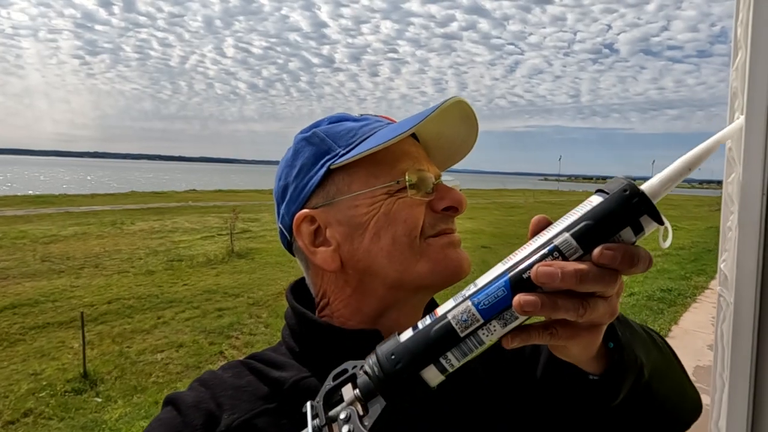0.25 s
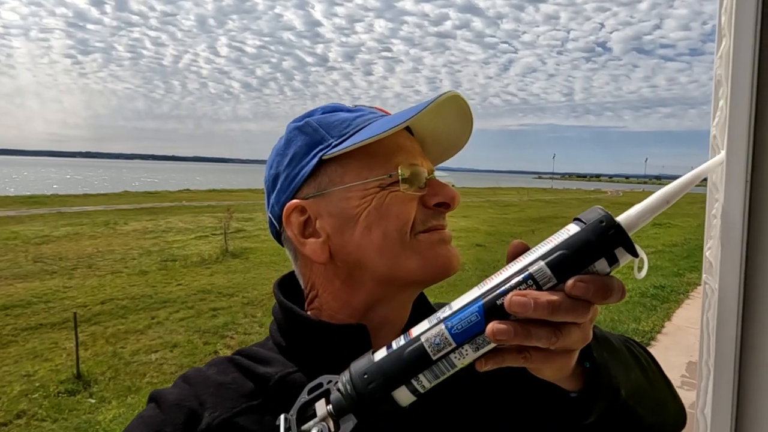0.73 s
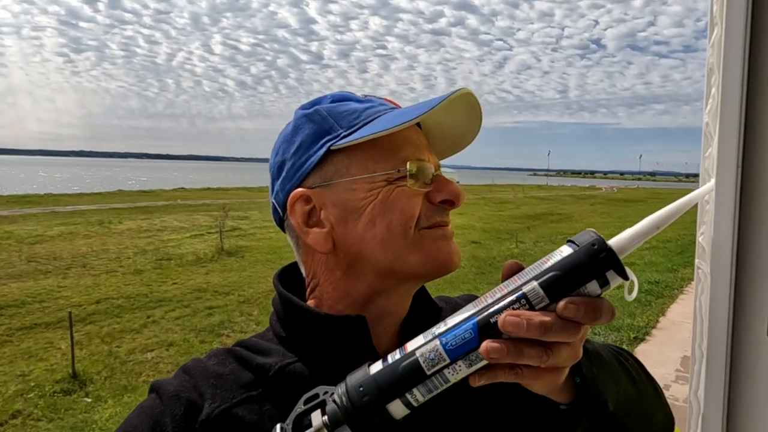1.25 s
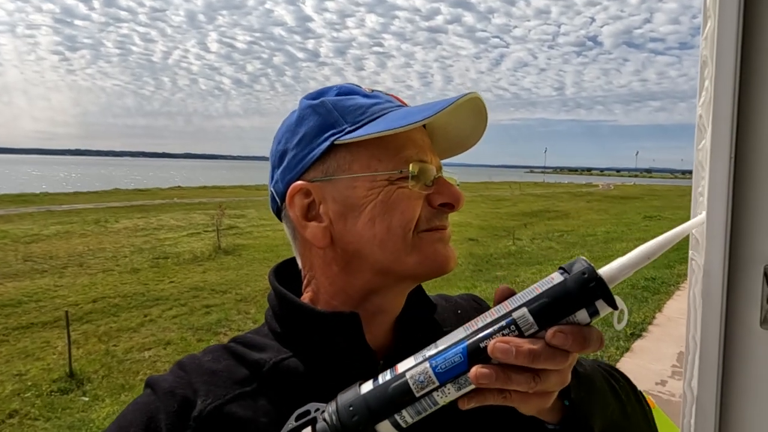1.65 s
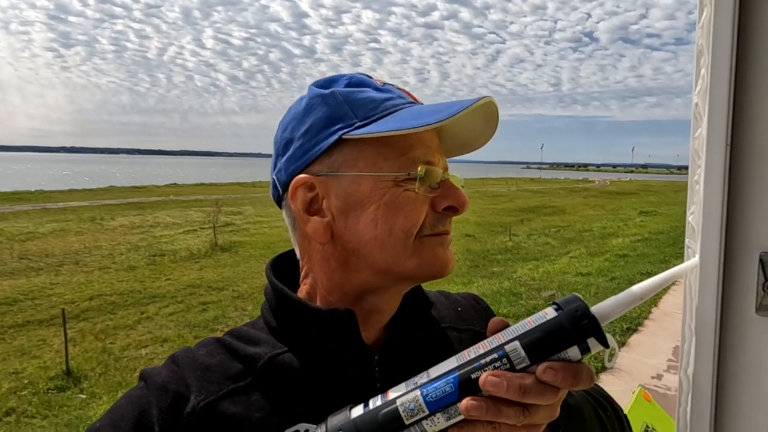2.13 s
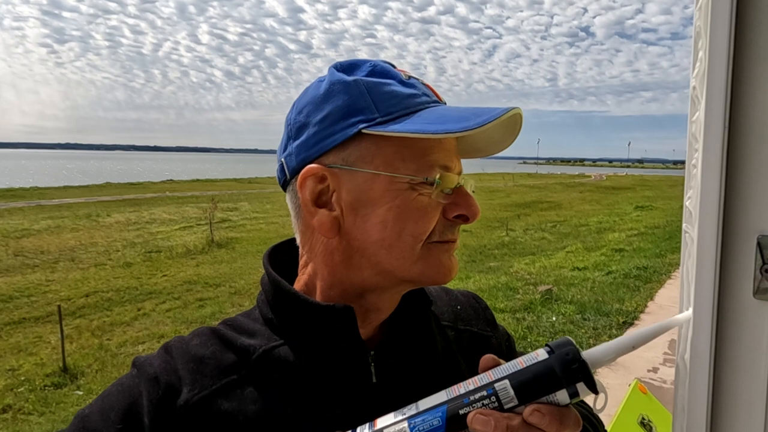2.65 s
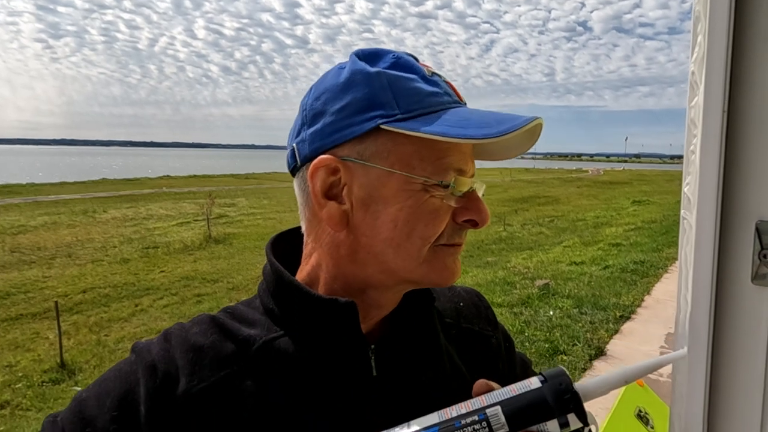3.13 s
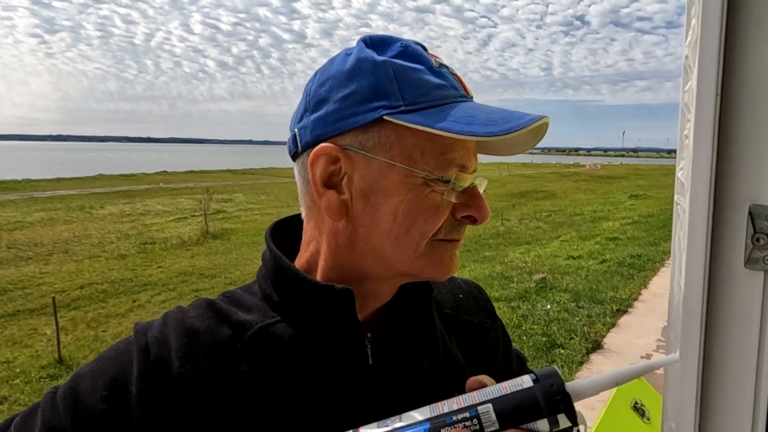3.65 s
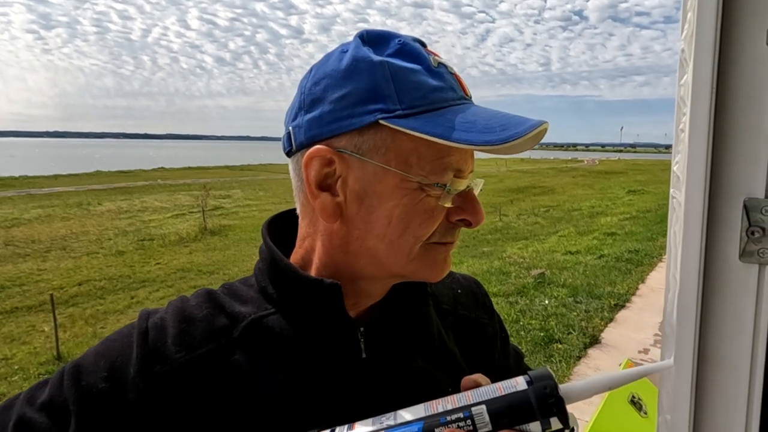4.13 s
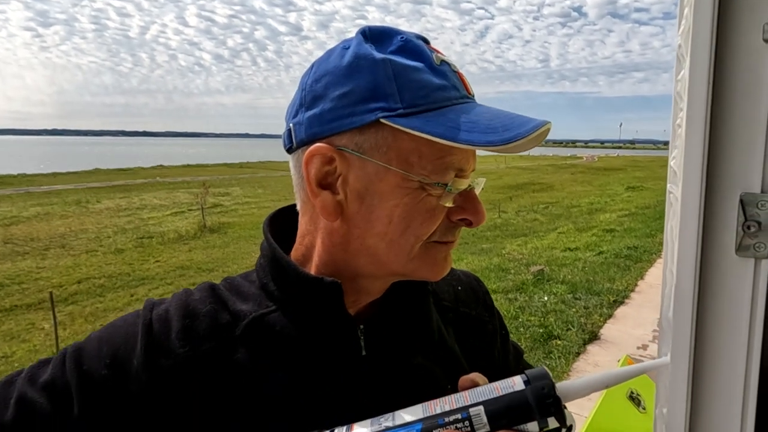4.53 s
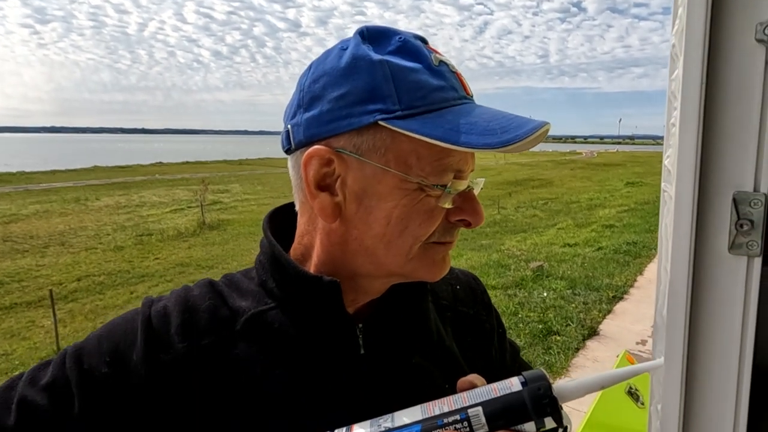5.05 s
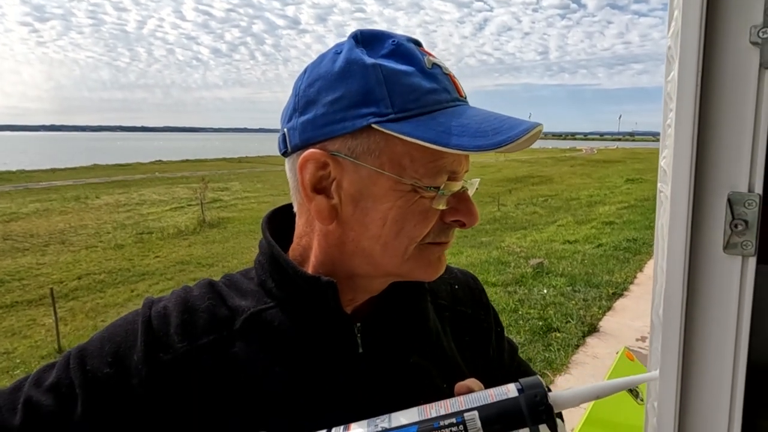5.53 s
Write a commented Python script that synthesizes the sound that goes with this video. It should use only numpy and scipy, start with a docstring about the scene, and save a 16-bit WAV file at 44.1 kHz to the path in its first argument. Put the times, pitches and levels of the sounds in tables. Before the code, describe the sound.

A caulking gun ticks, clicks and gives one sharp metallic snap, while low wind rumbles and buffets the microphone outdoors.

```python
"""A caulking gun in the wind

A hand squeezes a caulking gun beside a doorway in open country. Its steel pawl (the catch that grips
the push rod) ticks and clicks; then the release snaps, knocks the tube and leaves the rod ringing.
Wind thumps mostly on the right microphone, over a far drone and the rustle of a jacket.
The sound starts in the centre and widens to stereo."""
import sys
import numpy as np
from scipy import signal
from scipy.fft import rfft, irfft, next_fast_len
from scipy.io import wavfile
from scipy.ndimage import map_coordinates

SR = 44100
rng = np.random.default_rng(int(sys.argv[2]) if len(sys.argv) > 2 else 0)


def generate_wav(sig):
    """Save sig (samples, or channels by samples) to the path in sys.argv[1] as 16-bit PCM at SR."""
    pcm = np.round(np.clip(np.atleast_2d(sig).T, -1, 1) * 32767).astype(np.int16)
    wavfile.write(sys.argv[1], SR, pcm)


N = 255339


def amp(db):
    """Turn a level in dB into a gain."""
    return 10 ** (np.asarray(db) / 20)


def along(points, hz):
    """Read between (Hz, value) points on a log frequency scale."""
    freqs, values = np.transpose(points)
    return np.interp(np.log(hz + 1), np.log(freqs + 1), values)


def curves(rows):
    """Draw each column after the time as a curve, one value per sample."""
    times, *columns = np.transpose(rows)
    return [np.interp(np.arange(N) / SR, times, column) for column in columns]


def wobble(rate):
    """A smooth curve through `rate` random values a second."""
    return map_coordinates(rng.standard_normal(int(N * rate / SR) + 4), [np.arange(N) * rate / SR])


def filtered(x, response):
    """Change the strength and phase of each frequency in x."""
    size = next_fast_len(x.shape[-1] + 8192)
    return irfft(rfft(x, size) * response(np.fft.rfftfreq(size, 1 / SR)), size)[..., :x.shape[-1]]


def noise(spectrum, size=N):
    """Noise shaped by (Hz, dB) points, with an average (rms) level of 1."""
    x = filtered(rng.standard_normal(size), lambda hz: amp(along(spectrum, hz)))
    return x / np.sqrt(np.mean(x ** 2) + 1e-20)


def rough_tone(hz, t, rough):
    """A sine whose phase takes random steps of about `rough` radians a sample."""
    return np.sin(2 * np.pi * hz * t + np.cumsum(rng.normal(0, rough, len(t))))


def add(track, start, sound):
    """Mix a sound into a track from `start` seconds on."""
    part = track[..., round(start * SR):][..., :sound.shape[-1]]
    part += sound[..., :part.shape[-1]]


# How the background rises and falls. Each row: time in seconds, drone gain in dB, rustle gain in dB.
BACKGROUND_GAINS = [(0, -61, -78.5), (.85, -63, -86), (1.6, -62, -86.5), (2.47, -61, -81.5),
                    (2.76, -62.5, -86), (3.69, -60.5, -81.5), (3.95, -60.5, -78), (4.2, -60.5, -77),
                    (4.45, -60.5, -87.5), (4.9, -58.5, -75), (5.3, -63, -86), (5.69, -68, -101),
                    (5.79, -69, -101)]
# The tone colours of drone and jacket. Each row: frequency in Hz, relative level in dB.
DRONE_SPECTRUM = [(26, -33.5), (45, -5), (87, -1), (125, -22.5), (165, -11), (320, -28.5), (450, -29),
                  (810, -36), (1000, -33.5), (1300, -31), (1950, -36.5), (2300, -45.5), (3400, -52.5),
                  (4400, -65.5), (7000, -64.5), (9100, -99), (15400, -120)]
JACKET_SPECTRUM = [(2000, -30), (3500, -1.5), (6500, -2.5), (8100, -5), (9300, -17), (10800, -18.5),
                   (12000, -12), (12700, -15), (13200, -44)]

def background():
    """A far drone, a thin whine that follows its level, and the rustle of a jacket."""
    drone_db, rustle_db = curves(BACKGROUND_GAINS)
    # Left and right differ more in the treble.
    apart = lambda hz: amp(along([(150, -29.5), (600, -11), (1500, -6), (5000, 1)], hz))
    drone = noise(DRONE_SPECTRUM) + filtered(noise(DRONE_SPECTRUM), apart) * [[1], [-1]]
    crackle = amp(1.7 * wobble(5.8) + 3.8 * wobble(75))
    cloth = noise(JACKET_SPECTRUM) + amp(-0.5) * noise(JACKET_SPECTRUM) * [[1], [-1]]
    drone *= amp(16.5 + .7 * wobble(6.7))
    whine_hz, width_hz = 3390, 45
    whine = np.sqrt(2) * rough_tone(whine_hz, np.arange(N) / SR, np.sqrt(2 * np.pi * width_hz / SR))
    return amp(drone_db) * (drone + amp(-23.5) * whine) + amp(rustle_db - 3) * crackle * cloth


# The breeze between gusts. Each row: time in seconds, rumble level in dB.
BREEZE_LEVELS = [(0, -49.5), (.12, -47), (.35, -44), (.55, -46), (1.1, -52.5), (1.45, -38), (1.75, -43.5),
                 (1.95, -34.5), (2.4, -44.5), (2.9, -42.5), (3.15, -46.5), (3.8, -40), (4.4, -39),
                 (4.9, -35.5), (5.05, -41.5), (5.4, -33.5), (5.79, -50)]
# Single gusts. Each row: peak time in seconds, seconds to rise and to fade about 20 dB (sign ignored),
# rumble level in dB, flutter compared with rumble in dB, left-side gain in dB.
WIND_GUSTS = [(.24, 0.1846, 0.04, -36.5, -21.5, -3.5), (.369, 0.35, 0.49, -38, -15.5, -12.5),
              (.48, -0.2839, -0.01, -36, -18, -3.5), (2.74, 0.1421, 0.13, -29, -32, -5),
              (3.51, 0.08, 0.06, -40, -14, -8.5), (3.715, .03, -0.07, -29, -22.5, -5),
              (4.05, 0.33, 0.41, -38, -17.5, -8), (4.18, -0.38, 0.22, -34, -26.5, -11.5),
              (4.43, -0.0069, -0.0155, -29, -18, -8.5), (4.691, -0.028, 0.0613, -20.5, -8, -9.5),
              (4.722, 0, 0.0437, -22.5, -2.5, -13), (4.755, 0.008, 0.0325, -24, -9.5, -11.5),
              (4.86, 0.12, 0.0839, -25, -13, -5.5), (4.95, 0.215, 0.06, -33.5, -12.5, -12),
              (5.143, -0.0034, 0.06, -16, -2, -10), (5.17, 0.02, 0.02, -24, -11, -7.5),
              (5.27, -0.0819, 0.1844, -22, -10, -8), (5.32, -0.0062, 0.0189, -18.5, -5.5, -4),
              (5.405, -0.0258, -0.09, -25, -7, -7), (5.465, 0.08, -0.0942, -24, -10.5, -6),
              (5.551, 0.0873, 0.15, -28, -14.5, -8.5), (5.66, 0.0124, -0.0372, -22.5, -10, -4),
              (5.72, 0.1434, 0.03, -29.5, -11.5, -0.5)]

def gusts():
    """Gusts swell over an uneven breeze: gives rumble gain, flutter gain and left-side gain in dB."""
    peak, rise, fade, db, flutter_db, left_db = np.transpose(WIND_GUSTS)[:, :, None]
    rounding, flutter_speed = .12, 1.53  # gusts have round tops; flutter comes and goes faster
    t = np.arange(N) / SR - peak
    from_peak = t / np.abs(np.where(t < 0, rise, fade))
    drop_db = -20 * (np.hypot(from_peak, rounding) - rounding)
    each_gust = amp(db + drop_db)
    breeze = amp(curves(BREEZE_LEVELS)[0] + 3.5 * wobble(rate=12))
    rumble = breeze + each_gust.sum(axis=0)
    flutter = amp(-51) + amp(db + flutter_db + flutter_speed * drop_db).sum(axis=0)
    balance_db = (-1.5 * breeze + (each_gust * left_db).sum(axis=0)) / rumble  # the strongest leads
    return rumble, flutter, balance_db


def thump(hz):
    """A swirl of air bursts on the microphone: a quick pulse whose pitch sags."""
    peak_cycles, sag_per_cycle = 0.654, 0.29
    cycles = np.arange(round(8 / hz * SR)) / SR * hz
    wave = np.sin(2 * np.pi * (1 - np.exp(-sag_per_cycle * cycles)) / sag_per_cycle)
    pulse = wave * (cycles / peak_cycles) ** 2 * np.exp(-2 * cycles / peak_cycles)
    return pulse / np.abs(pulse).max()


def surge(hz):
    """One slow push and pull of air pressure."""
    t = np.arange(round(1.01 / hz * SR)) / SR
    return np.sin(2 * np.pi * hz * t) * np.hanning(len(t))


# The wind's deep rumble and higher flutter. Each row: frequency in Hz, relative level in dB.
RUMBLE_SPECTRUM = [(12, -1), (28, -1.5), (60, -7.5), (110, -19.5), (200, -37.5), (400, -72), (800, -130)]
FLUTTER_SPECTRUM = [(50, -40), (110, 4.5), (200, -6.5), (400, -19.5), (800, -37.5), (1500, -65.5),
                    (3000, -130)]
# Quick thumps and slow surges. Each row: start in seconds, relative level in dB, starting pitch in Hz.
WIND_THUMPS = [(4.685, -14.5, 329.7), (4.7104, -14, 327.5), (4.749, -25.5, 199.2), (5.127, -22, 169),
               (5.1426, -19, 418.6), (5.148, -21.5, 249.1), (5.28, -18.5, 353.9), (5.306, -20.5, 251.6),
               (5.327, -25, 278.6), (5.35, -33, 300.6), (5.385, -30, 256.4), (5.402, -28, 269.9),
               (5.412, -27.5, 220.1), (5.462, -31, 258), (5.498, -46, 600), (5.548, -32.5, 197),
               (5.635, -31.5, 266), (5.659, -29, 222.5), (5.68, -31.5, 220.9)]
WIND_SURGES = [(.219, -32.5, 35.22), (0.489, -31, 40.3), (2.719, -24, 41.3), (3.70, -26.5, 27.62),
               (4.167, -26, 35.08), (4.417, -23, 29.85), (4.677, -9, 46.11), (4.747, -11.5, 47.76),
               (4.78, -18.5, 30.11), (4.853, -17.5, 33.06), (4.882, -19.5, 36.06), (5.111, -14.5, 39.5),
               (5.143, -15, 70.83), (5.156, -18, 55.2), (5.21, -20, 21.97), (5.26, -11, 32.05),
               (5.305, -12, 47.46), (5.331, -16, 44.9), (5.446, -18.5, 51.1), (5.54, -16, 59.9),
               (5.62, -19.5, 24.93), (5.664, -18.5, 35.05)]

def wind(cutoff_hz=1800):
    """Swirls of air hit the right microphone; the left gets a weaker share plus swirls of its own."""
    rumble, flutter, left_db = gusts()

    def swirls():
        return rumble * noise(RUMBLE_SPECTRUM) + flutter * amp(3.46 * wobble(40)) * noise(FLUTTER_SPECTRUM)

    right = amp(-2.5) * swirls()
    for start, db, hz in WIND_THUMPS:
        add(right, start, amp(db) * thump(hz))
    for start, db, hz in WIND_SURGES:
        add(right, start, amp(db) * surge(hz))
    right = filtered(right, lambda hz: 1 / (1 + (hz / cutoff_hz) ** 4))
    shifted = filtered(right, lambda hz: np.exp(1j * along([(40, -0.36), (300, 0.859)], hz)))
    left = amp(left_db) * (shifted + amp(-8) * swirls())
    return amp(2.5) * np.array([left, right])


# How long the doorway echoes. Each row: frequency in Hz, seconds to fade 60 dB.
ECHO_FADES = [(500, 0.12), (2000, 0.17), (3000, 0.23), (6000, 0.24), (9000, 0.2), (12000, 0.14),
              (15000, 0.13)]

def doorway(x):
    """Scattered echoes swell for a few milliseconds, then each band fades at its own pace."""
    hz, t, bands = signal.stft(rng.standard_normal((2, SR // 2)), SR, nperseg=256)
    tail = signal.istft(bands * amp(-60 * t / along(ECHO_FADES, hz)[:, None]), SR, nperseg=256)[1]
    tail *= np.clip((np.arange(tail.shape[1]) / SR - .006) / 0.0048, 0, 1)
    tail = tail[0] + .5 * tail[1] * [[1], [-1]]
    echoes = signal.fftconvolve(x.mean(0)[None], tail / np.linalg.norm(tail[0]), axes=1)[:, :N]
    # Air and soft ground soak up the treble.
    dull = lambda f: amp(along([(3000, 1.5), (7000, -0.5), (11000, -5), (15000, -7)], f))
    return filtered(echoes, dull)


# Rubs of hand and trigger, and squeaks of the rod.
# Each row: start in seconds, length in seconds, pitch in Hz, relative level in dB.
HAND_RUBS = [(4.812, .016, 2600, -62), (0.15, 0.236, 2926, -75), (0.248, 0.0248, 2780, -64),
             (0.251, 0.031, 6000, -76), (.47, 0.07, 5050, -80.5), (0.017, 0.252, 3440, -80.5),
             (0.445, 0.092, 4000, -82.5), (0.655, 0.086, 3500, -83), (1.748, 0.15, 4964, -83),
             (2.384, 0.056, 5000, -77.5), (3.525, 0.1185, 6680, -70), (3.877, 0.42, 7060, -81.5),
             (4.083, 0.041, 3620, -69.5), (4.404, 0.144, 6150, -81), (4.795, 0.0743, 5840, -43),
             (5.02, 0.154, 5970, -81)]
ROD_SQUEAKS = [(.678, .016, 3400, -69), (1.238, .016, 3400, -71), (1.315, .028, 3400, -71),
               (3.748, .022, 5100, -70), (3.915, .035, 5100, -79), (4.11, .1, 5100, -74)]

def sliding():
    """Hand and trigger slide with a grainy hiss, and the rod chirps in its guide."""
    out = np.zeros(N)
    grit = amp(2.5 * wobble(150))
    for start, length, hz, db in HAND_RUBS:
        swell = np.hanning(round(length * SR))
        hiss = noise([(hz / 2, -24), (hz, 0), (hz * 1.3, -10), (hz * 2, -50)], size=len(swell))
        add(out, start, amp(db) * swell * hiss)
    out *= grit
    for start, length, hz, db in ROD_SQUEAKS:
        t = np.arange(round(length * SR)) / SR
        add(out, start, amp(db) * np.hanning(len(t)) * rough_tone(hz, t, rough=0.073))
    return out


def ring(modes, attack, rough, flat=0, settle_s=.1):
    """A struck part rings at its modes (natural tones); the hand on it makes them waver."""
    t = np.arange(SR) / SR
    bent_time = t - flat * settle_s * (1 - np.exp(-t / settle_s))  # pitch starts low by the share `flat`
    tones = sum(amp(db - 60 * t / fade_s) * rough_tone(hz, bent_time, rough) for hz, db, fade_s in modes)
    return tones * (1 - np.exp(-t / attack))


def resonances(modes):
    """A filter that lets through the tones a steel part favours."""
    return lambda f: sum((-1) ** k * amp(db) * 1j * f * width / (hz * hz - f * f + 1j * f * width)
                         for k, (hz, width, db) in enumerate(modes))


def blurred(modes, widen=2.5):
    """The same steel heard from all sides: its tones are wider and their powers add up."""
    return lambda f: np.sqrt(sum(np.abs(resonances([(hz, widen * width, db)])(f)) ** 2
                                 for hz, width, db in modes))


def clack(response, rise_s, fade_s):
    """A short rattle shakes all of a part's tones evenly; the result peaks at 1."""
    t = np.arange(SR // 20) / SR
    spectrum = rfft(rng.standard_normal(len(t)) * (1 - np.exp(-t / rise_s)) * amp(-60 * t / fade_s))
    rattle = irfft(spectrum / np.abs(spectrum), len(t)) * amp(-20 * t / fade_s)
    sound = filtered(rattle, response)
    return sound / np.abs(sound).max()


# The steel pawl's tones. Each row: pitch in Hz, width in Hz, relative level in dB.
PAWL_MODES = [(676, 170, -18.5), (1156, 160, -20), (1555, 260, -10), (2420, 236, -2), (3088, 180, -8.5),
              (3254, 130, -8), (4044, 170, -13), (4712, 240, -8), (5433, 270, -8.5), (6330, 390, -17),
              (7460, 300, -7.5), (8870, 480, -19.5), (11430, 1000, -20.5)]
# Its clicks. Each row: start in seconds, level in dB, brightness in dB per octave,
# left over right in dB, favoured pitch in Hz.
PAWL_CLICKS = [(0.163, -54.5, -9, 6, 4650), (.254, -58.5, -7, 1.5, 5770), (.259, -52, -6.5, 1.5, 2900),
               (.495, -63.5, -1, -0.5, 12000), (0.6836, -62, -2, 0, 3400), (1.744, -59, -3.5, -1, 3300),
               (1.808, -61.5, 0, -3, 12000), (2.0817, -48, -4, 16.5, 2200), (2.093, -30.5, -4.5, 8, 1730),
               (2.3195, -57, -4.5, 3, 3173), (2.406, -52.5, -0.5, 7, 4700), (2.44, -64, 2, -1, 4650),
               (2.657, -60.5, -1, 4.5, 3160), (3.069, -65.5, -2.5, 4.5, 4200), (3.209, -64, 3, 1, 4500),
               (3.5298, -58, -5, 3.5, 6296), (3.541, -59, -0.5, 4.5, 11700), (3.5783, -45, 0, 7, 6400),
               (3.591, -49, -2.5, -2.5, 6000), (3.618, -35, -9.5, -1.5, 1520), (3.6218, -30, 2, 2, 4020),
               (3.6265, -38.5, -9.5, 6.5, 800), (3.638, -31, -2.5, 3.5, 4700),
               (3.6384, -29, -4, -0.5, 2425), (3.6428, -40, -10.5, -0.5, 1170),
               (3.647, -46.5, -4, -1.5, 3400), (3.751, -61, 6, 3.5, 11900), (3.999, -53.5, 0.5, 1.5, 6000),
               (4.9863, -53, -4.5, 3, 5297), (5.2696, -55, -8.5, 2.5, 4284),
               (5.309, -62.5, -2, -5.5, 11500), (5.316, -62, -5.5, -7.5, 4400),
               (5.45, -55.5, -9.5, 1.5, 5224)]

def pawl(body, favour_db, graze_db=-45, favour_octaves=0.16, top_hz=13000):
    """Each contact rattles the pawl; weak ones only graze it and blur its tones."""
    out = np.zeros((2, N))
    for start, db, bright_db, pan_db, hz in PAWL_CLICKS:
        steel = body(PAWL_MODES) if db > graze_db else blurred(PAWL_MODES)

        def colour(f):
            tilt_db = bright_db * np.log2((f + 300) / 3000)
            lift_db = favour_db * np.exp(-(np.log2((f + 1) / hz) / favour_octaves) ** 2)
            return steel(f) * amp(tilt_db + lift_db) / (1 + (f / top_hz) ** 20)

        click = clack(colour, rise_s=0.0007, fade_s=0.01)
        add(out, start, amp(db) * click * amp([[pan_db / 2], [-pan_db / 2]]))
    return out


# The release lever's tones. Each row: pitch in Hz, width in Hz, relative level in dB.
LEVER_MODES = [(1360, 660, -9.5), (2014, 210, -1), (2365, 380, -8.5), (3041, 200, 1), (3337, 250, -3.5),
               (4140, 470, -3), (5220, 490, 0), (6270, 370, 1.5), (7860, 500, -2), (8380, 600, -4),
               (9400, 500, -5), (10800, 580, -10), (11320, 750, -12), (13340, 820, -13.5),
               (15074, 900, -31)]
# The tube's hollow knock. Each row: pitch in Hz, level in dB, seconds to fade 60 dB.
TUBE_MODES = [(563.3, -3, 0.02), (303, -32.5, 0.0051)]
# The lever letting go, then hitting its stop. Each row: start in seconds, level in dB.
LEVER_SCRAPES = [(4.824, -17.5)]
LEVER_STRIKES = [(4.8285, -7), (4.8438, -31), (4.847, -29.5)]

def release(body, dull_hz=7000):
    """The lever lets go with a soft scrape, knocks the tube, then strikes its stop and bounces."""
    out = np.zeros(N)
    lever = body(LEVER_MODES)
    softened = lambda f: lever(f) / (1 + 1j * f / dull_hz) ** 2
    for start, db in LEVER_SCRAPES:
        add(out, start, amp(db) * clack(softened, rise_s=0.00412, fade_s=0.027))
        add(out, start + 0.0018, ring(TUBE_MODES, attack=0.0011, rough=.002))
    for start, db in LEVER_STRIKES:
        add(out, start, amp(db) * clack(lever, rise_s=0.00067, fade_s=0.011))
    return out


# The push rod's tones. Each row: pitch in Hz, level in dB, seconds to fade 60 dB.
ROD_MODES = [(755, -41, .35), (1997, -53.5, .5), (2767, -59, 1.2), (2853, -56, .65), (3112, -57, .75),
             (3386, -62, .5), (4005, -62, 1.3)]

def rod():
    """The rod rings after the lever's first strike and trembles in the grip; its top tone bends up."""
    out = np.zeros(N)
    lower = ring(ROD_MODES[:-1], attack=.002, rough=.034)
    top = ring(ROD_MODES[-1:], attack=.002, rough=.04, flat=.015)
    add(out, LEVER_STRIKES[0][0], lower + top)
    return out * amp(2.2 * wobble(rate=40))


# How the gun reaches the two microphones. Each row: frequency in Hz, left over right in dB.
LEFT_BALANCE = [(6000, .5), (10000, 3.5), (11800, 1), (13200, -8), (15000, -3)]
# How far the left one is ahead. Each row: frequency in Hz, phase lead in radians.
LEFT_LEAD = [(800, 0), (2500, -.4), (4500, -1), (6500, -.7), (8500, -.2), (11500, -.2), (15000, -.3)]

def scene():
    """The gun and its echo reach two microphones, along with the background and the wind."""
    direct = pawl(resonances, favour_db=8) + release(resonances)
    echo = doorway(pawl(blurred, favour_db=0) + release(blurred))
    gun = direct + amp(-11) * echo + rod() + sliding()
    left_over_right = lambda hz: amp(along(LEFT_BALANCE, hz)) * np.exp(1j * along(LEFT_LEAD, hz))
    placed = filtered(gun, lambda hz: left_over_right(hz) ** np.array([[.5], [-.5]]))
    return placed + background() + wind()


# The stereo width. Each row: time in seconds, width from 0 (centre only) to 1 (full stereo).
STEREO_WIDTH = [(0, 0.0044), (1.5, 0), (2.05, 0.077), (2.6, 0.357), (3.6, 0.464), (4.6, 0.777),
                (5.79, 0.88)]

def record(dry):
    """The sound widens from the centre to stereo, and the highest treble is cut off."""
    top_hz, edge_hz = 15400, 40
    mid = (dry[0] + dry[1]) / 2
    side = (dry[0] - dry[1]) / 2 * curves(STEREO_WIDTH)[0]
    treble_cut = lambda hz: 1 / (1 + np.exp(np.clip((hz - top_hz) / edge_hz, -50, 50)))
    return filtered(np.array([mid + side, mid - side]), treble_cut)


dry = scene()
out = record(dry)
generate_wav(out)
```